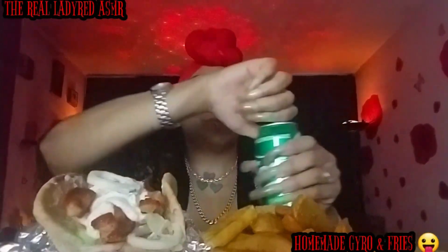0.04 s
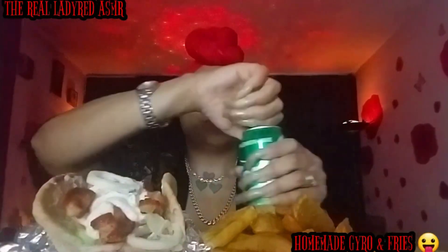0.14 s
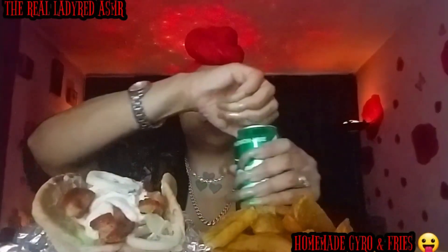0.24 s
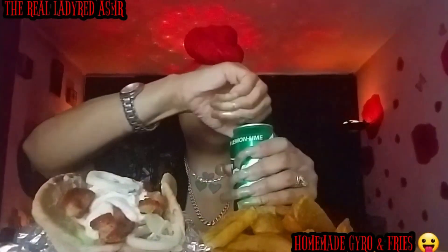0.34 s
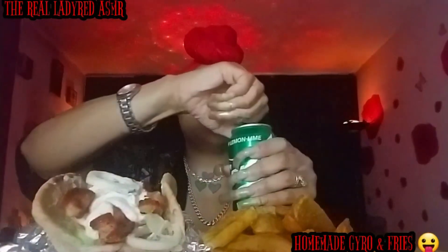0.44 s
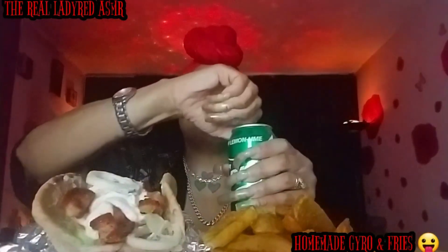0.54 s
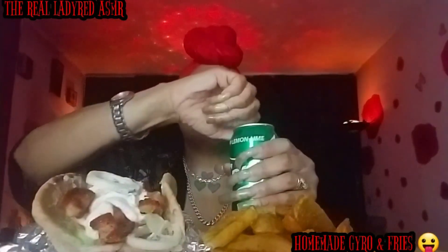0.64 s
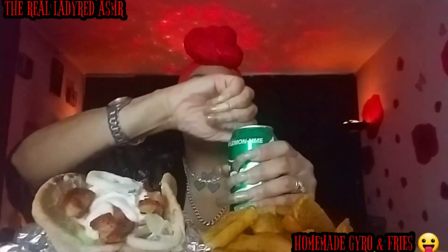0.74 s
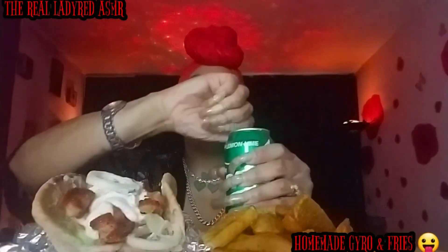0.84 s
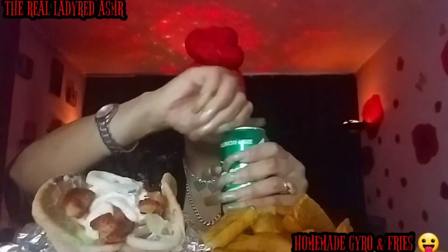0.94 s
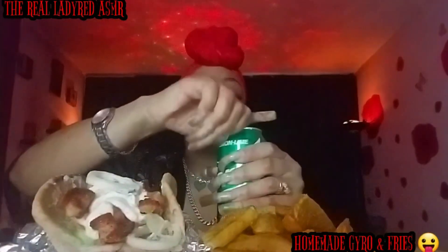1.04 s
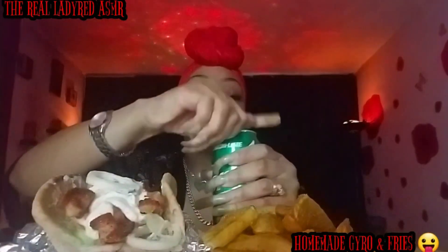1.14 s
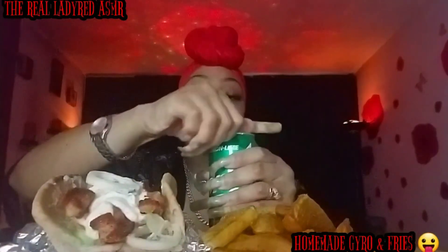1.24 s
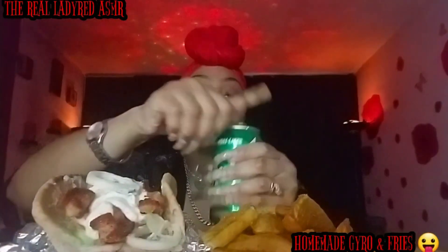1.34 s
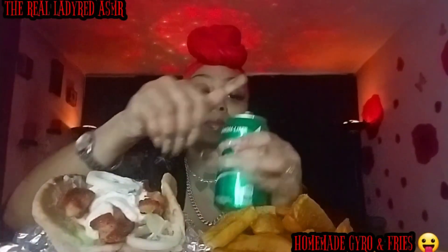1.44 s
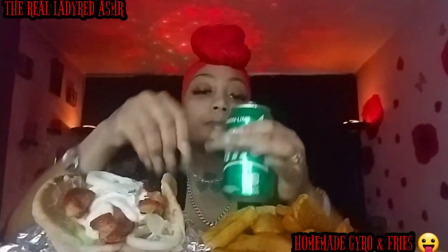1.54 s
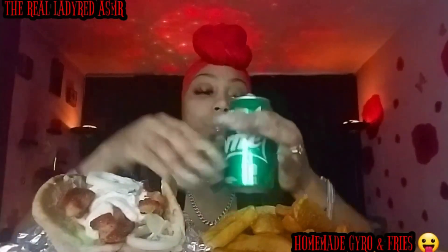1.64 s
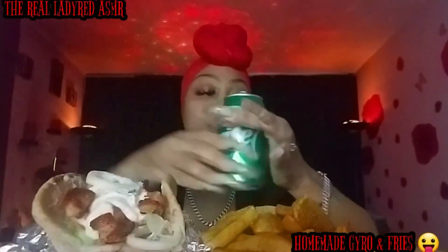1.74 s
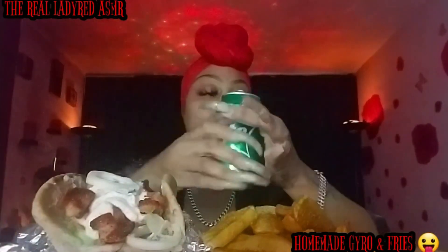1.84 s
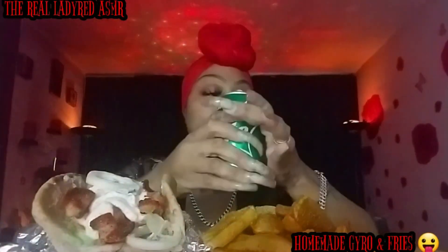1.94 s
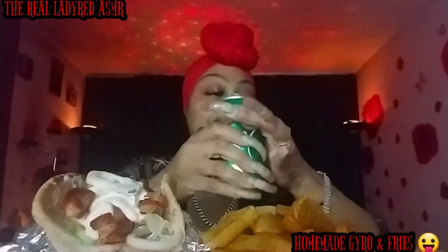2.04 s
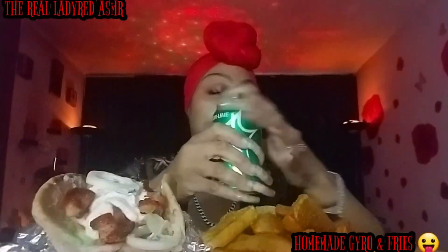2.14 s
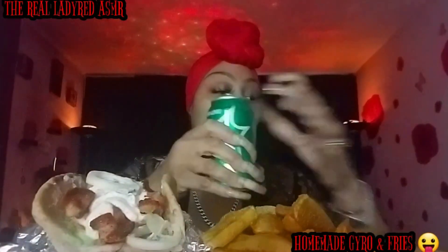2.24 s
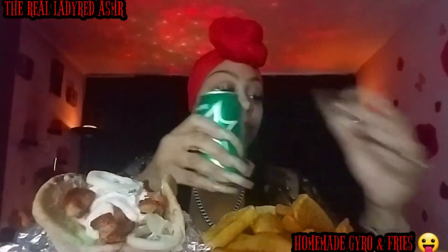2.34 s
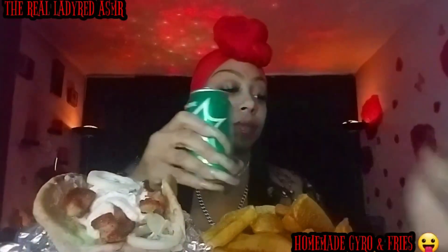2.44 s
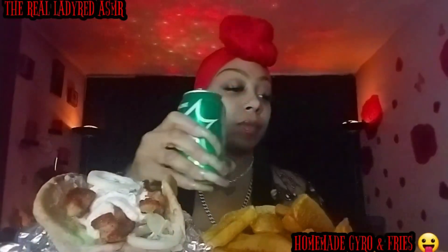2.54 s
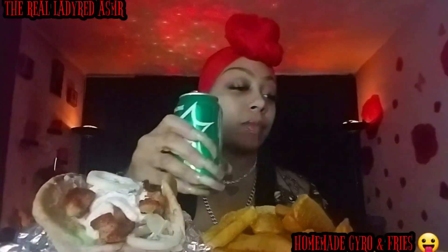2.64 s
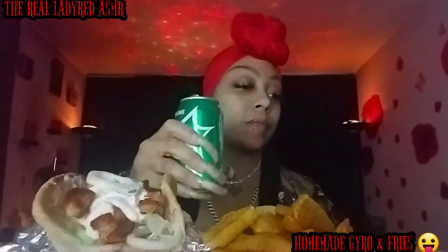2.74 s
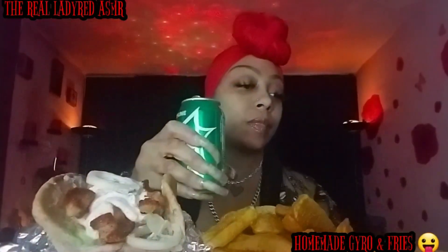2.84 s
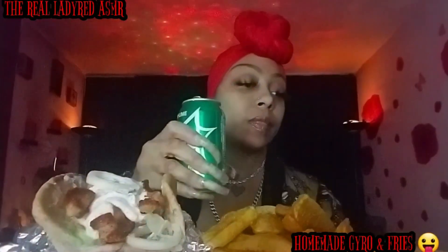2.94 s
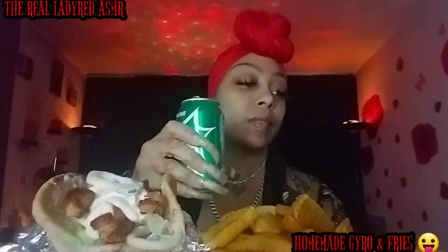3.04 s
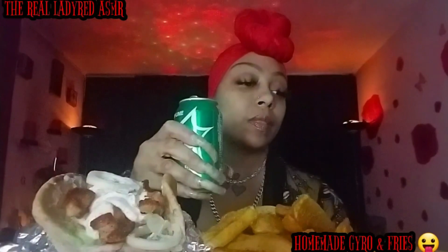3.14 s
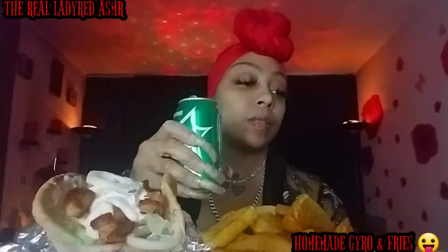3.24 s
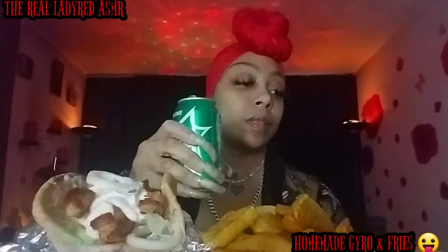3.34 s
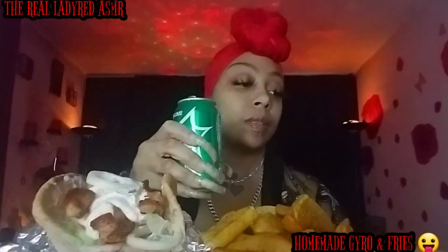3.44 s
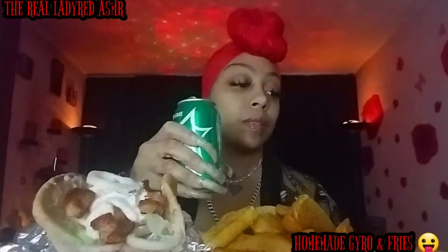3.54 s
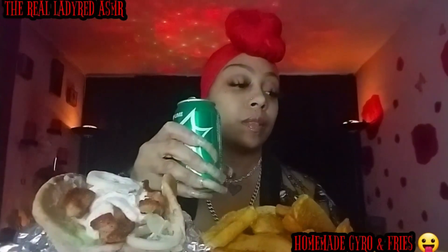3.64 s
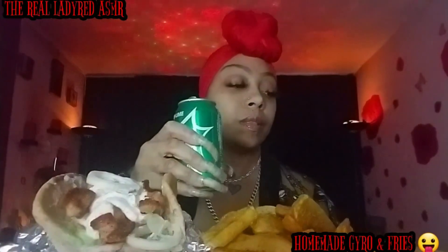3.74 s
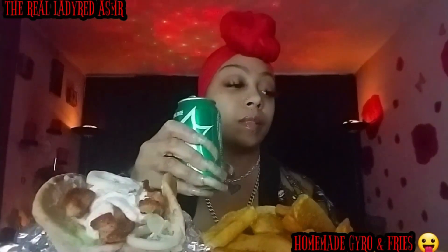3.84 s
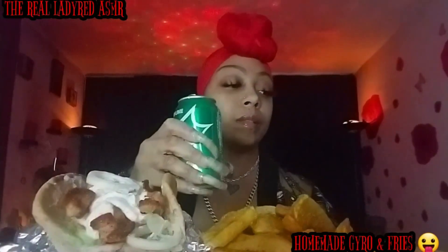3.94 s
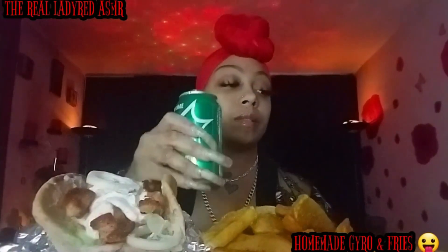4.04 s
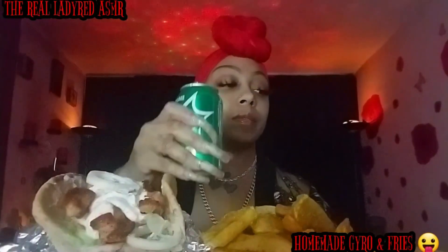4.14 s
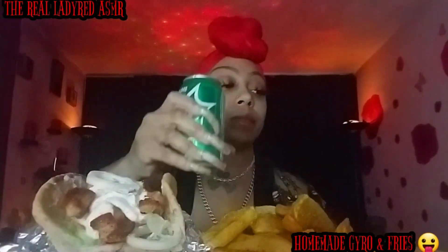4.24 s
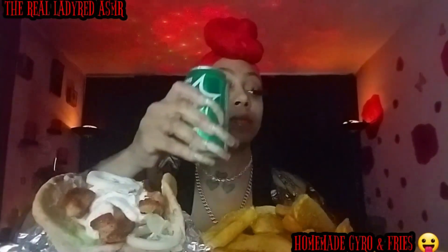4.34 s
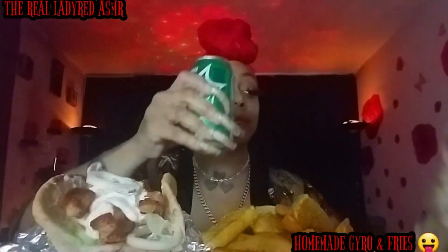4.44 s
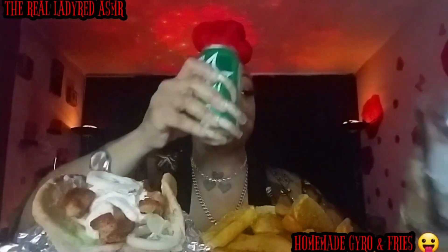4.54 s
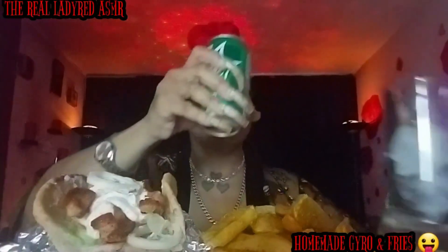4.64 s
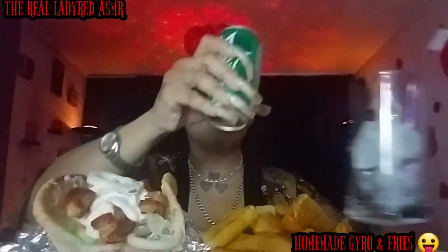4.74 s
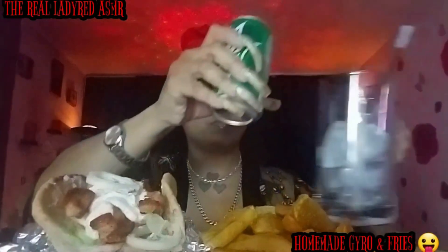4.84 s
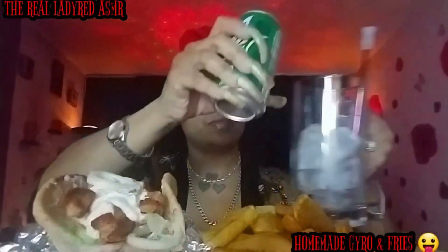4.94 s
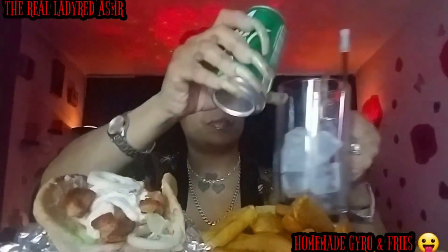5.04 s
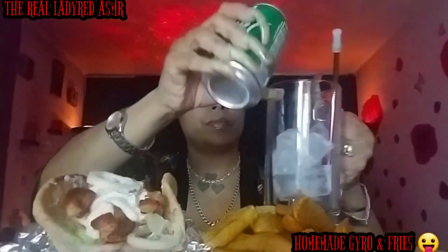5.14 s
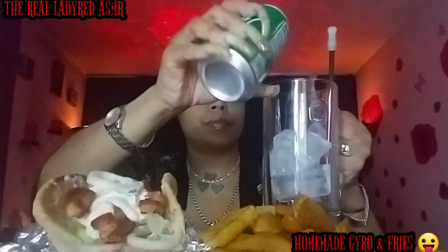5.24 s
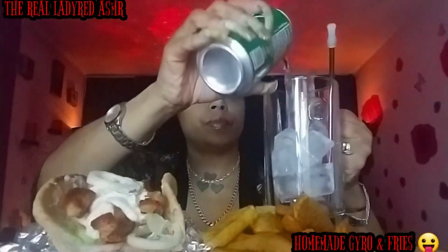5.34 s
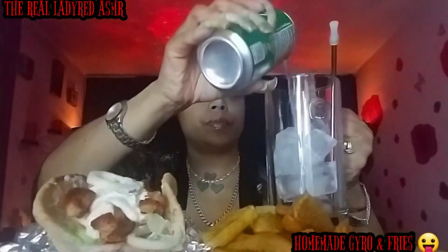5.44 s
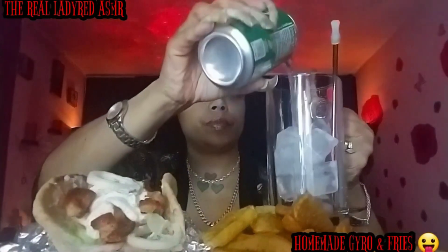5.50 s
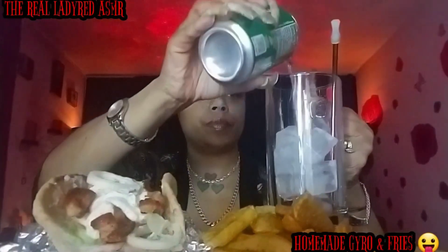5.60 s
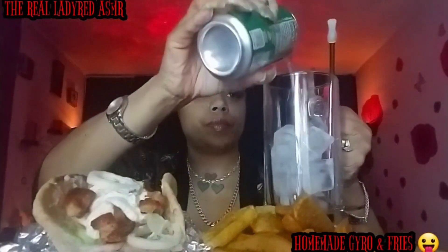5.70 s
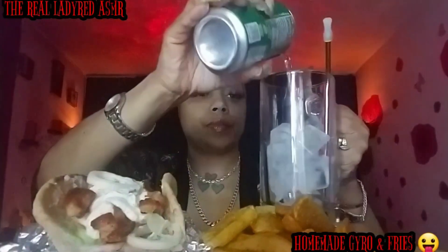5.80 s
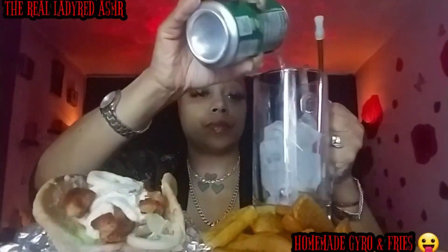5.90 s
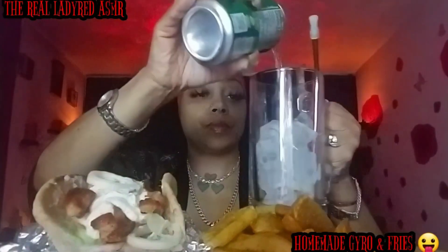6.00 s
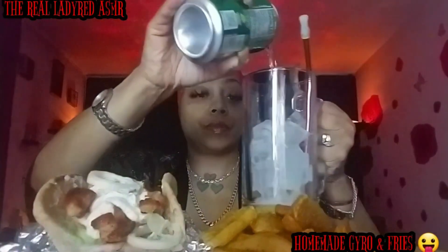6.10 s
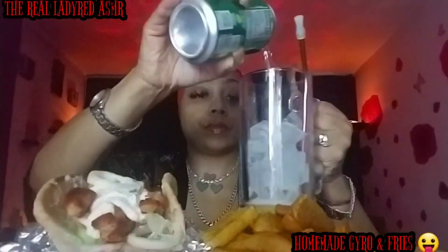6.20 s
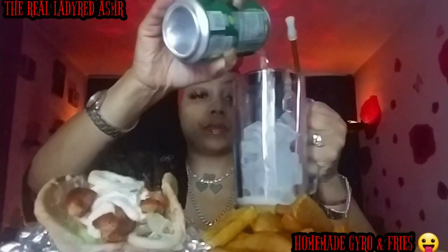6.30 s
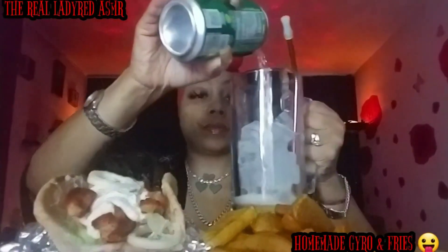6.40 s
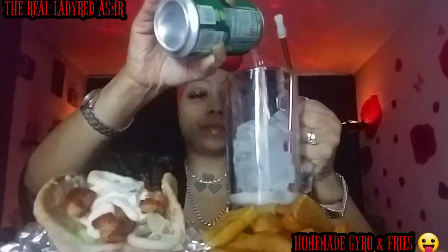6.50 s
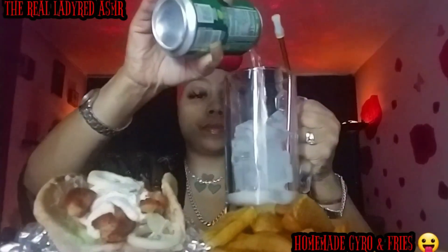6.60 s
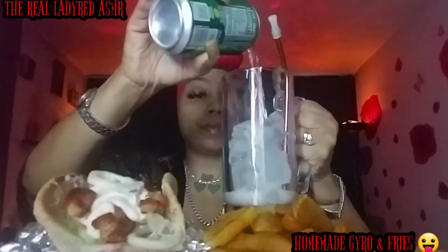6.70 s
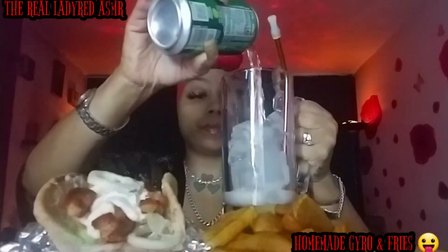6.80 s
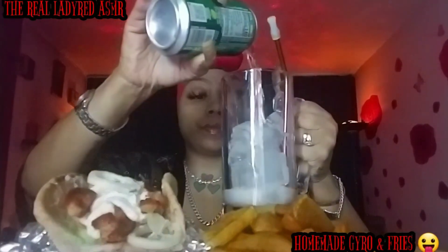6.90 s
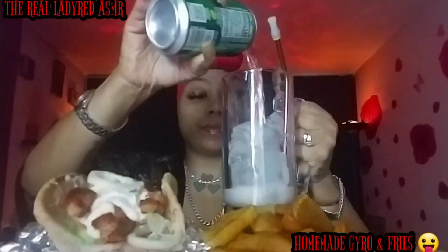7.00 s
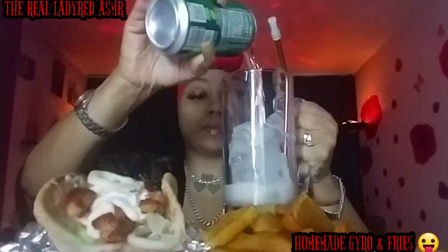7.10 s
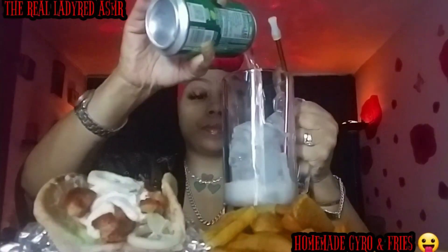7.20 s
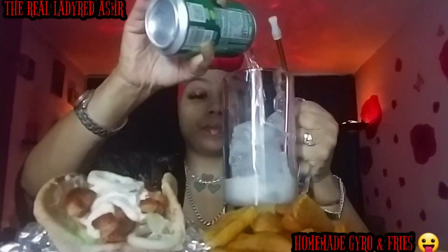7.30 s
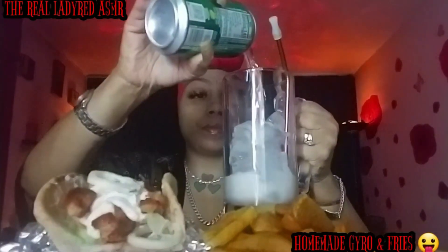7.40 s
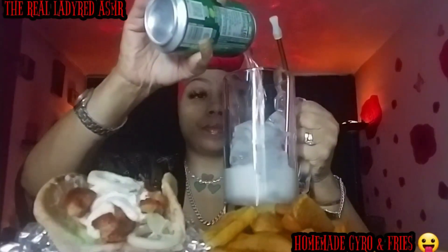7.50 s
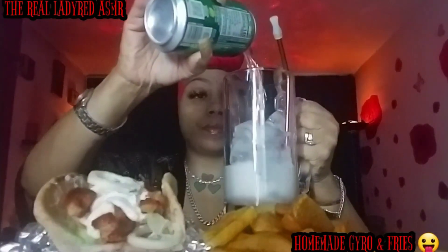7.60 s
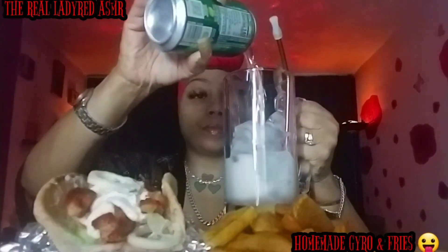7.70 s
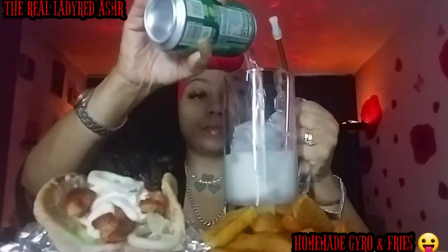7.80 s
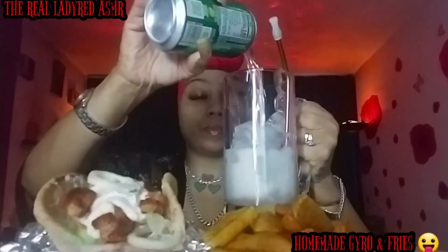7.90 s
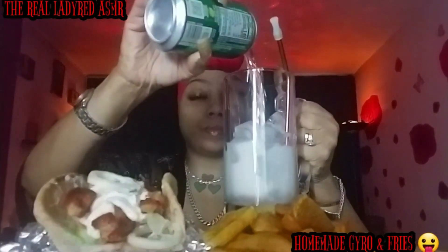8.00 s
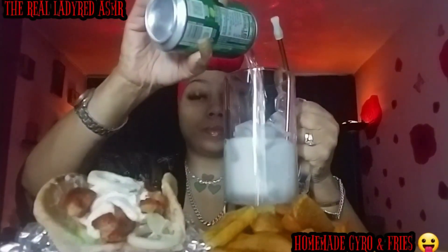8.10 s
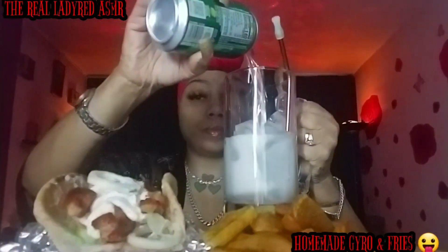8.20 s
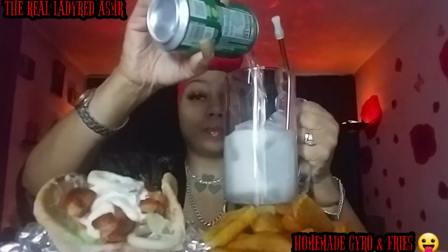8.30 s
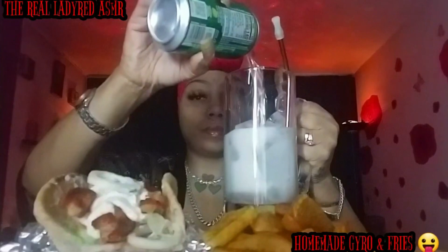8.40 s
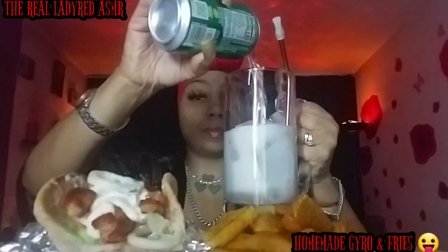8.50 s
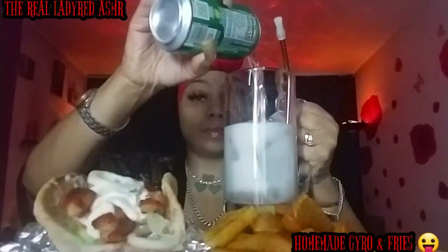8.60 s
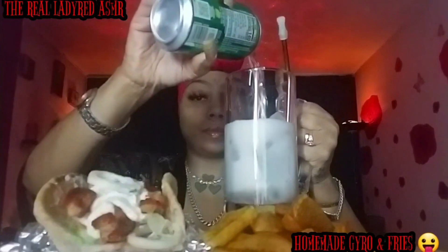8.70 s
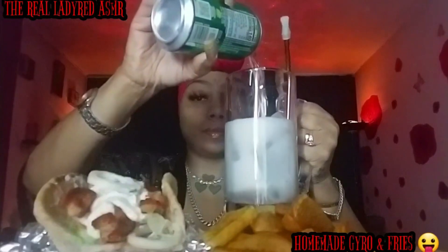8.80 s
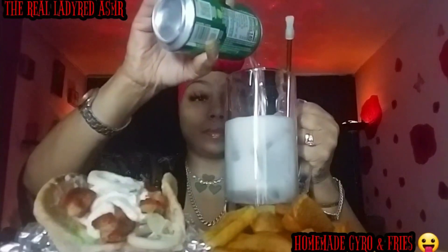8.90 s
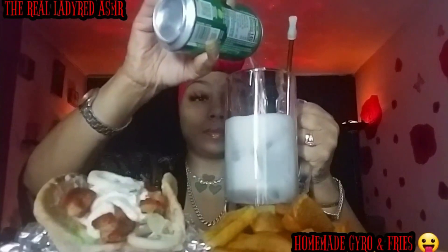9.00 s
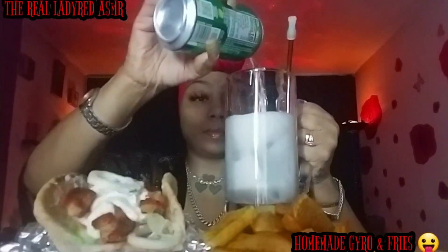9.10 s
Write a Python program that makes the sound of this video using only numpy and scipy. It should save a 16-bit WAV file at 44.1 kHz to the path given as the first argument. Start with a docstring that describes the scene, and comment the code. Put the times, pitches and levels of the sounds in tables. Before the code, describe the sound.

A soda can snaps open with a loud burst of gas, ice clinks as a glass mug is dragged over, then soda splashes and fizzes.

```python
"""Fingers rustle on a drink can close to a phone's microphone; the tab tears the lid in snaps and gas bursts out.
A glass mug of ice is dragged over the table, its cubes clinking; then soda splashes over the ice, glugs and foams.
Snaps, clatter and splashes are shaped noise, rings and bubbles are damped tones, gas and fizz are grainy noise.
A small soft room answers and hums behind; the background sinks after the pop and returns."""
import sys
import numpy as np
from scipy import signal
from scipy.fft import rfft, irfft, next_fast_len
from scipy.io import wavfile
from scipy.ndimage import map_coordinates

SR = 44100
rng = np.random.default_rng(int(sys.argv[2]) if len(sys.argv) > 2 else 0)


def transcribe(u):
    """Save the signal u as a 16-bit wav file named by the first command-line argument.

    u: samples, shape (n,) or (channels, n), limited to [-1, 1]; the rate is SR.
    q: integer samples, one column per channel.
    """
    v = np.clip(np.atleast_2d(u).T, -1, 1)
    q = np.round(v * 32767).astype(np.int16)
    wavfile.write(sys.argv[1], SR, q)


N = 403515  # samples, 9.15 s


# Tab and lid snapping: (time [s], level [dB], brightness [dB])
SNAPS = [(.208, -23, 0.5), (.293, -39.5, -9.5), (.45, -16.5, 5), (.461, 3, 3), (.515, -20.5, 2),
         (.521, -4.5, 2), (.545, -4.5, -2.5), (.554, -5.5, 6.5), (.562, -11, 7), (.567, 8, 3),
         (.577, -3, 0.5), (.611, -12.5, 3), (.617, -5.5, 1.5), (.707, -9.5, 0), (.778, -38.5, -13),
         (.941, -42.5, -14), (1.054, -41, 1.5), (1.15, -24, 3.5), (1.4, -51, -10.5), (1.956, -30, 14),
         (2, -49, -8), (2.619, -48, -14)]
# Lid resonances, low to high: (frequency [Hz], width [Hz], level [dB])
LID = [(1300, 300, -2), (1880, 520, 0.5), (3700, 1600, 3.5), (6170, 1000, -1.5), (9395, 1200, -11)]
TEAR_S = (.4, .75)  # while the lid tears; before and after, the tab only clicks
TAB_HIGH_DB = -14  # those clicks have less top
LOW_DB, HIGH_DB = 1.5, -2  # shares of the low and high lid resonances at brightness 0


def lid_snaps():
    """Each snap is a noise burst through the lid: a bright one shakes the high resonances, a dull one the low."""
    s, db, bright_db = np.transpose(SNAPS)
    only_click = (s < TEAR_S[0]) | (s > TEAR_S[1])
    low_db = LOW_DB - bright_db
    high_db = HIGH_DB + bright_db + TAB_HIGH_DB * only_click
    snaps = np.zeros(N)
    for share_db, part in ((low_db, LID[:2]), (0, LID[2:3]), (high_db, LID[3:])):
        noise = bursts(s, db + share_db + 5.0, 0.006, tail_db=-23.5, tail_t60=.08)
        snaps += through(noise, part)
    return snaps


# The tab springs back: (time [s], level [dB], starting pitch [Hz], t60 [s])
PING = [(.958, -42.5, 3970, 0.035)]


def tab_ping():
    """The tab rings as one short damped tone."""
    return blips(*np.transpose(PING), rise=.001, rough=.05)


# Puffs of gas: (time [s], level [dB], hold [s])
GAS = [(0.452, -21, .015), (0.506, -33.5, .05), (0.561, -6.5, .025), (0.691, -39, .002)]
# Colour of the gas jet: (frequency [Hz], level [dB per Hz])
JET = [(35, -37.5), (60, -23), (202, -31.5), (715, -27.5), (767, -23.5), (1250, -5), (1860, -13),
       (2050, -8), (2900, 0.5), (4120, -0.5), (5330, -10.5), (6430, -3.5), (16000, -39)]
GAS_RISE_S, GAS_T60, GAS_TAIL_DB, GAS_TAIL_T60 = .012, .09, -16.5, .24  # t60s in s; tail under the puff


def gas_jet():
    """Gas hisses out through the slit; foam sputters in it and shakes the lid."""
    spit = grainy(1.4, 200, clump_db=3.5) * amp(2.0 * wobble(60))
    s, db, hold = np.transpose(GAS)
    puffs = swells(s, db, GAS_RISE_S, hold, GAS_T60)
    tails = swells(s, db + GAS_TAIL_DB, GAS_RISE_S, hold, GAS_TAIL_T60)
    hiss = unit(coloured(spit, JET) + 0.2 * resonant(spit, LID))
    return (puffs + tails) * hiss


# Fingers on the can: (time [s], rustle level [dB], wall tone over the rustle [dB], hold [s])
TOUCHES = [(-.01, -40.5, 2, 0.016), (0.066, -51.5, 0, 0.038), (0.132, -46.5, 4, 0.015),
           (0.213, -62, -9, .1), (.925, -60, -12, .01), (1.2, -66.5, -21, 0.035), (1.255, -61, -29, .02)]
# Rustle of skin: (frequency [Hz], width [Hz], level [dB])
SKIN = [(1950, 420, -2.5), (2630, 1100, 3), (3490, 234, 4), (4290, 300, 0)]
# Can wall resonances: (frequency [Hz], width [Hz], level [dB])
WALL = [(723, 60, -2.5), (976, 77, -0.5)]
TOUCH_RISE_S, TOUCH_T60 = 0.0175, .14  # s
EDGE_DB = -17  # the rim rustles under the skin


def fingers():
    """Rubbing skin makes grainy noise that rustles at the rim and sounds the can wall."""
    s, db, wall_db, hold = np.transpose(TOUCHES)
    rustle_gain = swells(s, db, TOUCH_RISE_S, hold, TOUCH_T60)
    wall_gain = swells(s, db + wall_db, TOUCH_RISE_S, hold, TOUCH_T60)
    rim = resonant(grainy(1.5, 60), LID[3:4])
    rustle = resonant(grainy(1.8, 68), SKIN) + amp(EDGE_DB) * rim
    return rustle_gain * rustle + wall_gain * resonant(grainy(2.5, 40, clump_db=10.5), WALL)


def can():
    """The can close to the microphone: lid, tab, gas and fingers."""
    return lid_snaps() + tab_ping() + gas_jet() + fingers()


# Stream of soda: (time [s], splash level [dB])
POUR = [(5.5, -80), (5.53, -50), (5.67, -80.5), (5.7, -49), (5.78, -64), (5.84, -57), (6.25, -61),
        (6.5, -56), (7.25, -58.5), (7.5, -54.5), (8.45, -51), (8.7, -63.5), (9.15, -53.5)]
# Splash resonances: (frequency [Hz], width [Hz], level [dB])
SPLASH = [(3895, 1460, 0.5), (6530, 1000, -3), (8700, 3100, -9)]
# Liquid sloshing between the cubes: (time [s], level [dB])
POCKETING = [(5.5, -96), (5.72, -70), (5.84, -48.5), (6.05, -55), (6.2, -55.5), (6.45, -49), (6.65, -66),
             (6.75, -49), (6.85, -65), (7, -50.5), (7.25, -52), (7.32, -59.5), (7.5, -54.5), (8.1, -43.5),
             (8.2, -60), (8.45, -64), (8.7, -68), (9.15, -83)]
# Pockets between the cubes: (frequency [Hz], width [Hz], level [dB])
POCKETS = [(1560, 1730, -5.5), (2265, 660, 1.5), (2850, 1140, -1.5)]
# Air column over the rising liquid: (time [s], frequency [Hz])
COLUMN = [(5.5, 482), (7, 619), (8.1, 853), (9.15, 890)]
POOL_S, FOAM_S = (5.72, 5.8), (8.05, 8.25)  # liquid gathers at the bottom; foam closes over the cubes
GURGLE_DB, DRY_DB, TICK_DB = -7, -25.5, -19  # gurgle over the splash, its change before the pool; ticks over the splash


def stream():
    """The stream breaks on the cubes into spits and spray, sloshing, with small bubbles gurgling and bursting."""
    splash_db = curve(POUR)
    # hundreds of spits a second, a few of them strong
    s, size, tune, life = rng.random((4, 900))
    s = 5.45 + 3.65 * s
    size_db = -4.5 * np.log(size + 0.024)
    spit_hz, spit_t60 = 2500 * 4.26 ** tune, 0.0046 + 0.0062 * life
    spits = unit(blips(s, size_db, spit_hz, spit_t60, rise=0.13, rough=0.32, size=512))
    spray = grainy(3, 110, clump_db=3.5)
    splash = resonant(spray + 1.5 * spits, SPLASH)
    slosh = amp(curve(POCKETING) + 4.1 * wobble(18)) * resonant(spray, POCKETS)
    # small bubbles tuned around the air column, which shortens as the mug fills
    pitch = np.interp(s, *np.transpose(COLUMN)) * (0.868 + 0.62 * tune ** 3.2)
    some = slice(None, None, 3)
    gurgle = unit(blips(s[some], size_db[some], pitch[some], 14 / pitch[some], rise=0.056, rough=0.082, size=1024))
    gurgle_db = GURGLE_DB + DRY_DB * (1 - ramp(POOL_S))
    # the tiniest bubbles burst as bright ticks
    few = slice(1, None, 5)
    ticks = unit(blips(s[few], size_db[few], 6000 + 5000 * tune[few], 0.0057, rise=0.2, rough=0.59, size=512))
    return amp(splash_db) * (splash + amp(gurgle_db) * gurgle + amp(TICK_DB) * ticks) + slosh


# Single drops on the ice: (time [s], level [dB], starting pitch [Hz])
DROPS = [(5.5462, -31, 6915), (5.6866, -30, 4400), (5.7153, -33.5, 2240), (5.8118, -32.5, 6530),
         (5.8259, -25.5, 3770), (5.8352, -27.5, 4290), (5.8979, -30, 4160), (5.9272, -31.5, 3710),
         (6.0895, -24.5, 2106), (6.128, -26, 4070), (6.1683, -27.5, 3940), (6.2174, -22, 3480),
         (6.267, -18, 3366), (6.4118, -33, 2180), (6.446, -27.5, 4180), (6.473, -27, 2050),
         (6.517, -32, 2060), (6.5497, -32, 5670), (6.6157, -30.5, 4220), (6.727, -30, 2100),
         (6.757, -26.5, 4200), (6.929, -31, 4280), (7.0087, -23.5, 2200), (7.0149, -26, 2200),
         (7.0805, -31, 4050), (7.217, -36, 4000), (7.3721, -28.5, 2970), (7.3808, -30, 2630),
         (7.415, -28, 2560), (7.4703, -30, 3860), (7.495, -28, 2740), (7.622, -32, 3970),
         (7.6655, -31, 3830), (7.7833, -29.5, 2840), (7.8065, -32.5, 3230), (7.836, -27, 5880),
         (7.865, -25.5, 2570), (7.9243, -31, 2950), (7.935, -23, 3180), (7.969, -22.5, 2900),
         (8.014, -25, 3070), (8.0527, -17, 3040), (8.0963, -27, 3160), (8.132, -25.5, 3400),
         (8.3684, -32, 3950), (8.391, -30, 4020), (8.408, -29, 4050), (8.4197, -25, 3880),
         (8.4626, -30, 3700)]
DROP_DB, SPLAT_DB = -5, -9  # ring and splat, each over the drop's level


def drops():
    """A drop on ice rings briefly as a rough tone and splats as a noise burst."""
    s, db, hz = np.transpose(DROPS)
    ring = blips(s, db + DROP_DB, hz, 0.035, rise=0.043, rough=0.48)
    splat = bursts(s, db + SPLAT_DB, 0.0063, tail_db=-8.0, tail_t60=0.13)
    return ring + through(splat, SPLASH + POCKETS)


# Tiny bubbles bursting close by: (time [s], level [dB], starting pitch [Hz])
TICKS = [(6.1176, -44.5, 8640), (6.2226, -37, 8430), (6.2583, -41.5, 9000), (6.2874, -34, 8930),
         (6.8514, -40, 9870), (7.061, -43, 8500), (7.0789, -32.5, 9720), (7.2491, -35, 9200),
         (7.4296, -44, 9790), (7.4748, -37, 8970), (7.5282, -36, 8770), (7.6489, -49, 8490),
         (7.7052, -44, 10900), (7.836, -36, 9080), (7.8684, -37.5, 8460), (7.8946, -43, 9040),
         (7.928, -48, 9760), (7.9759, -49.5, 8370), (8.133, -39, 8810), (8.272, -37, 8990),
         (8.3274, -39, 8480), (8.4084, -41, 9200)]


def close_ticks():
    """Each tiny bubble bursts as a very short high tone."""
    s, db, hz = np.transpose(TICKS)
    return blips(s, db, hz, 0.013, rise=.03, rough=0.32, size=512)


# Big bubbles under the surface: (time [s], level [dB], starting pitch [Hz])
GLUGS = [(6.276, -34, 1080), (6.411, -34, 1095), (6.445, -34.5, 1580), (6.693, -22.5, 540),
         (6.759, -32.5, 1120), (6.937, -28, 700), (6.949, -21.5, 650), (6.983, -24, 636), (7.007, -28, 590),
         (7.372, -29.5, 770), (7.401, -30.5, 1140), (7.608, -38, 715), (7.76, -26.5, 760),
         (7.838, -40, 780), (7.916, -37, 1470), (8.053, -37, 850), (8.093, -24.5, 830), (8.126, -15, 790),
         (8.298, -35, 855), (8.442, -38, 670), (8.561, -34.5, 815), (8.599, -29.5, 775),
         (8.676, -37.5, 890)]


def glugs():
    """A big bubble sounds as a low damped tone with rising pitch."""
    s, db, hz = np.transpose(GLUGS)
    return blips(s, db, hz, 0.024, rise=0.071, rough=0.12)


# Bursting bubbles: (time [s], level [dB])
FIZZ = [(.8, -75.5), (1.7, -74), (2.03, -58.5), (2.8, -55.5), (3.85, -55), (4.5, -62.5), (5.3, -74.5),
        (5.7, -67.5), (6.1, -53), (7.5, -51.5), (8.3, -46), (9.15, -48.5)]
# Colour of the fizz in the mug: (frequency [Hz], level [dB per Hz])
FROTH = [(710, -35), (1200, -5), (1380, -21), (1570, -7.5), (1910, -18.5), (2020, -9.5), (2560, -5),
         (3430, -5.5), (4130, 1.5), (5130, -14), (6230, -8.5), (7250, -21.5), (9310, -22.5), (16000, -47)]
# Colour of the fizz through the can's opening: (frequency [Hz], level [dB per Hz])
IN_CAN = [(650, -50), (1100, -17), (1260, -19), (1450, -9), (1660, -9.5), (1870, -4.5), (2700, -15.5),
          (3600, -4.5), (4150, 1), (5070, -12.5), (6390, -14), (10600, -29.5), (15500, -35)]
TREBLE_DB, BODY_DB = -17, -9.5  # shares of treble and body in the mug's fizz
POURED_TREBLE_DB, FOAM_BODY_DB = 3.5, -9  # more treble until foam closes over the cubes; body change under foam


def fizz():
    """Fine bursting bubbles are grainy noise, first inside the can, then in the mug."""
    pool, foam = ramp(POOL_S), ramp(FOAM_S)
    treble_db = TREBLE_DB + POURED_TREBLE_DB * (1 - foam)
    body_db = BODY_DB + FOAM_BODY_DB * foam
    froth = coloured(grainy(0.85, 40, clump_db=1.9), FROTH)
    body, treble = filtered(froth, lambda hz: [hz < 2300, hz > 7500])
    middle = froth - treble - body
    poured = middle + amp(treble_db) * unit(treble) + amp(body_db) * unit(body)
    in_can = coloured(grainy(0.98, 30, clump_db=1.0), IN_CAN)
    return amp(curve(FIZZ)) * (pool * poured + (1 - pool) * in_can)


def soda():
    """The soda: stream, drops and ticks are low-passed, glugs and fizz are not."""
    return low_passed(stream() + drops() + close_ticks(), 10430) + glugs() + fizz()


# Ice on glass: (time [s], level [dB], height on the glass [0-1], hardness [dB per octave])
CLINKS = [(2.812, -33.5, 0.33, 8.5), (2.8334, -30.5, 0.6, 3), (2.8449, -27.5, .5, 4.5),
          (2.8614, -31, 0.7, 1), (2.9791, -36.5, 1, -1), (3.1662, -41, 1, -1), (3.3744, -42, 0, 2),
          (3.6461, -41.5, 0, 1.5), (3.7953, -41, .3, 3), (3.8596, -41, 0, 2), (3.929, -51, 0, 5.5),
          (4.2494, -52, .3, -6.5), (4.4667, -56, .1, 4.5), (4.5446, -72, .3, -2), (4.635, -47.5, 0.07, -7)]
# Modes of the mug: (frequency [Hz], t60 [s], level struck low [dB], level struck near the rim [dB])
MUG = [(483, 0.15, -4.5, -31), (2277, 0.085, 0.5, -3), (2906, 0.08, 0.5, -13), (3853, 0.22, -14.5, 0.5),
       (4750, .11, -2.5, -19), (5740, 0.088, -9, -20), (6412, 0.19, -19, -23.5), (9211, 0.13, -28, -26)]
# Crunch of the ice: (frequency [Hz], width [Hz], level [dB])
ICE = [(2276, 340, 6), (4320, 1850, 2), (5600, 760, -0.5), (9350, 730, -25)]
SCRUNCH_DB, SCRUNCH_HARD = 2.5, 1.5  # crunch noise over the clink; extra dB per unit of hardness


def clinks():
    """Where a cube meets the glass decides which modes ring; each clink adds crunch noise."""
    out, t = np.zeros(N + SR), np.arange(SR // 3) / SR
    for s, db, height, hardness_db in CLINKS:
        slip = .012 * np.cumsum(rng.standard_normal(len(t)))  # loose cubes rattling on the wall blur the ring
        ring = np.zeros(len(t))
        for hz, t60, low_db, rim_db in MUG:
            mode_db = low_db + height * (rim_db - low_db) + hardness_db * np.log2(hz / 3000)
            ring += amp(mode_db - 60 * t / t60) * np.sin(2 * np.pi * hz * t + slip)
        out[round(s * SR):][:len(t)] += amp(db) * ring * (1 - np.exp(-t / 0.00041))
    s, db, _, hardness_db = np.transpose(CLINKS)
    scrunch_db = db + SCRUNCH_DB + SCRUNCH_HARD * hardness_db
    return out[:N] + through(bursts(s, scrunch_db, 0.0034, tail_db=-9.5, tail_t60=0.13), ICE)


# Ice clattering in the mug: (time [s], level [dB], hardness [dB per octave])
CLATTER = [(3.753, -46, -3), (4.116, -49.5, 2.5), (4.605, -38, -9), (4.624, -39, -11), (4.634, -36, 1.5),
           (4.648, -27, 3), (4.659, -30.5, 5), (4.662, -36.5, 4)]
# Short ringing modes of the clatter: (frequency [Hz], level [dB], t60 [s])
CLATTER_MODES = [(2150, -3.5, 0.036), (2912, -5, .043), (3780, -3, .055), (4450, -4, .055),
                 (6450, -6.5, 0.087)]


def clatter():
    """Ice and mug clatter with crunch noise and a short ring."""
    s, db, hardness_db = np.transpose(CLATTER)
    crunch = through(bursts(s, db + 1.5, 0.0061, tail_db=-9, tail_t60=0.12), ICE)
    return crunch + struck(s, db, hardness_db, CLATTER_MODES, rough=0.406)


# Modes of the mug's base: (frequency [Hz], level [dB], t60 [s])
BASE = [(875, 1.5, 0.042), (1326, -7.5, .028), (2305, -2, 0.053), (3413, -3, 0.023)]
BUMP_S, BUMP_DB, BUMP_NOISE_DB = 3.352, -28.5, 3  # time, ring level, noise over the ring


def bump():
    """The mug's base knocks the table once: damped modes and a noise thud at the same pitches."""
    ring = struck([BUMP_S], BUMP_DB, 0, BASE, rough=0.66)
    thud = bursts([BUMP_S], [BUMP_DB + BUMP_NOISE_DB], 0.009, tail_db=-7, tail_t60=0.069)
    return ring + through(thud, [(hz, 0.44 * hz, level) for hz, level, _ in BASE])


# Mug dragged on the table: (time [s], rumble level [dB])
DRAG = [(3.1, -74), (3.22, -51), (3.3, -61), (3.45, -48), (3.58, -47), (3.731, -38), (3.85, -44.5),
        (3.98, -48.5), (4.048, -40.5), (4.15, -53.5), (4.3, -58)]
# Colour of the table's rumble: (frequency [Hz], level [dB per Hz])
TABLE = [(15, -42), (25, -10), (59, -3.5), (102, 3), (120, -4), (140, -14.5), (200, -19), (260, -48),
         (440, -120)]
# Colour of the scrape: (frequency [Hz], level [dB per Hz])
SCRAPE = [(110, -32), (180, -8), (302, 1), (578, -10.5), (631, -2.5), (2500, -23.5), (3250, -42),
          (5500, -120)]
SCRAPE_DB, SCRAPE_GROWS = -9.5, 0.48  # over the rumble at its mean; extra dB per dB of rumble


def drag():
    """The base judders over the table: low rumble with a grainy scrape that grows with it."""
    rumble_db = curve(DRAG)
    scrape_db = SCRAPE_DB + SCRAPE_GROWS * (rumble_db - np.mean(np.transpose(DRAG)[1]))
    rumble = coloured(rng.standard_normal(N), TABLE)
    return amp(rumble_db) * (rumble + amp(scrape_db) * coloured(grainy(1.2, 27), SCRAPE))


def mug():
    """The mug on the table and the ice in it; clatter and bump are low-passed."""
    return clinks() + low_passed(clatter() + bump(), 10000) + drag()


# Decay of the small soft room: (frequency [Hz], t60 [s])
WALLS = [(200, .25), (2000, 0.17), (10000, 0.084)]


def room(x):
    """Each frequency of the room's answer dies at its own speed."""
    hz, t, z = signal.stft(rng.standard_normal(SR // 3), SR, nperseg=256)
    decay = amp(-60 * t / along(WALLS, hz)[:, None])
    tail = signal.istft(z * decay, SR, nperseg=256)[1]
    delayed = np.pad(x, (200, 0))  # samples
    return signal.fftconvolve(delayed, tail / np.linalg.norm(tail))[:N]


# Background: (time [s], level [dB])
ROOM = [(0, -61.5), (.5, -62.5), (.8, -71.5), (1.7, -80.5), (1.95, -65.5), (2.3, -62), (9.15, -58)]
# Background colour: (frequency [Hz], level [dB per Hz])
AIR = [(15, -46.5), (25, -15.5), (114, -5), (153, -8.5), (206, -7.5), (373, -11.5), (489, -9.5),
       (840, -9.5), (1840, -37.5), (3720, -28.5), (4870, -39), (6740, -31.5), (16000, -42)]
# Wavering low tones of the house: (frequency [Hz], width [Hz], level over the background [dB])
HUM = [(117.4, 13, -8), (193, 30, -12)]


def background():
    """Room tone is coloured noise; narrow resonances of noise make the wavering hums."""
    air = coloured(rng.standard_normal(N), AIR)
    hum = np.zeros(N)
    for hz, width, db in HUM:
        hum += amp(db + 1.9 * wobble(2.5)) * resonant(rng.standard_normal(N), [(hz, width, 0)])
    return amp(curve(ROOM) + 0.66 * wobble(6)) * (air + hum)


def amp(db):
    """Decibels to amplitude."""
    return 10 ** (np.asarray(db) / 20)


def unit(x):
    """x at rms 1."""
    return x / np.sqrt(np.mean(x ** 2) + 1e-20)


def along(points, hz):
    """(Hz, value) points on a log axis."""
    f, v = np.transpose(points)
    return np.interp(np.log(hz + 1), np.log(f + 1), v)


def curve(points):
    """A level in dB per sample from (s, dB) points, silent outside them."""
    s, db = np.transpose(points)
    return np.interp(np.arange(N) / SR, s, db, -150, -150)


def ramp(span):
    """0 before the span, 1 after it."""
    return np.interp(np.arange(N) / SR, span, [0, 1])


def wobble(rate):
    """A smooth random curve, rate knots a second."""
    knots = rng.standard_normal(int(N * rate / SR) + 4)
    return map_coordinates(knots, [np.arange(N) * rate / SR])


def swells(s, db, rise, hold, t60):
    """Gain of overlapping gestures: rise, hold, die away."""
    t = np.arange(N) / SR - np.asarray(s)[:, None]
    fall = np.clip(t - rise - np.reshape(hold, (-1, 1)), 0, 4 * t60)
    shape = np.clip(t / rise, 0, 1) ** 2 * amp(np.asarray(db)[:, None] - 60 * fall / t60)
    return np.sqrt(np.sum(shape ** 2, axis=0))


def filtered(x, response):
    """x times a complex response of frequency."""
    m = next_fast_len(x.shape[-1] + 8192, real=True)
    spectrum = rfft(x, m) * response(np.fft.rfftfreq(m, 1 / SR))
    return irfft(spectrum, m)[..., :x.shape[-1]]


def through(x, peaks):
    """x through causal resonances (Hz, width Hz, dB), each twice for dark valleys."""
    def response(f):
        return sum(amp(db) * (1j * f * w / (c * c - f * f + 1j * f * w)) ** 2 for c, w, db in peaks)
    return filtered(x, response)


def resonant(x, peaks):
    """x through resonances, rms 1."""
    return unit(through(x, peaks))


def coloured(x, spectrum):
    """x with the given spectrum, rms 1."""
    return unit(filtered(x, lambda hz: amp(along(spectrum, hz))))


def low_passed(x, edge_hz):
    """A steep low-pass that removes the top treble."""
    return filtered(x, lambda hz: 1 / (1 + (hz / edge_hz) ** 12))


def grainy(spike_db, rate, clump_db=4.5):
    """Noise with sparse strong grains: each sample's size is log-exponential, in clumps."""
    size_db = spike_db * rng.exponential(size=N) + clump_db * wobble(rate)
    return rng.standard_normal(N) * amp(size_db)


def scatter(s, sounds):
    """Rows of short sounds summed at their times."""
    at = np.round(np.asarray(s) * SR).astype(int)[:, None] + np.arange(sounds.shape[1])
    return np.bincount(at.ravel(), sounds.ravel(), N + sounds.shape[1])[:N]


def bursts(s, db, t60, tail_db, tail_t60):
    """White noise bursts, each a sharp head on a longer tail."""
    t = np.arange(4096) / SR
    decay = amp(-60 * t / t60) + amp(tail_db - 60 * t / tail_t60)
    noise = rng.standard_normal((len(s), len(t)))
    return scatter(s, noise * amp(db)[:, None] * decay)


def blips(s, db, hz, t60, rise, rough, size=2048):
    """Short damped tones whose pitch rises; roughness breaks them into a flutter."""
    t = np.arange(size) / SR
    db, hz, t60 = (np.asarray(v)[..., None] for v in (db, hz, t60))
    walk = np.cumsum(rng.standard_normal((len(s), size)), axis=1)
    slip = rough * np.sqrt(hz / SR) * walk  # random walk of phase
    tone = np.sin(2 * np.pi * hz * t * (1 + rise * t / t60) + slip)
    onset = 1 - np.exp(-t * hz * 1.1)
    return scatter(s, tone * onset * amp(db - 60 * t / t60))


def struck(s, db, hardness_db, modes, rough):
    """Every blow rings all modes; hard blows favour the high ones."""
    out = np.zeros(N)
    for hz, level, t60 in modes:
        mode_db = db + level + hardness_db * np.log2(hz / 3000)
        out += blips(s, mode_db, np.full(len(s), hz), t60, rise=0.00958, rough=rough, size=4096)
    return out


def scene():
    """Can, soda and mug close by, the room's answer to them, and the background."""
    near = can() + soda() + mug()
    return (near + amp(-10.0) * room(near) + background())[None]


def record(dry):
    """The microphone input clips softly near full scale and keeps nothing above its band limit."""
    clipped = dry / (1 + np.abs(dry / .93) ** 6) ** (1 / 6)
    return filtered(clipped, lambda hz: hz < 15800)


dry = scene()
out = record(dry)
transcribe(out)
```